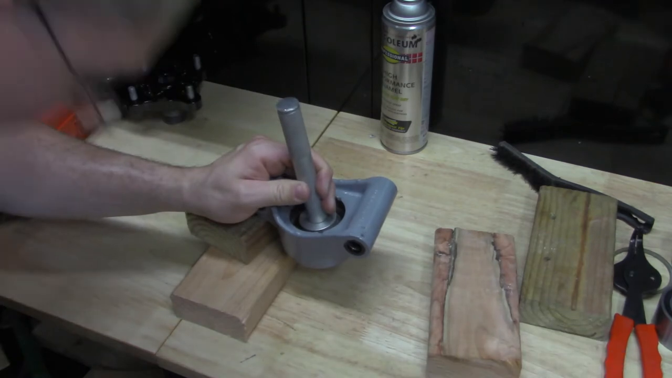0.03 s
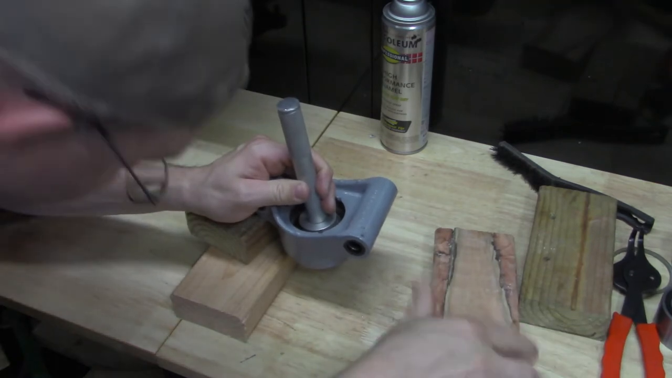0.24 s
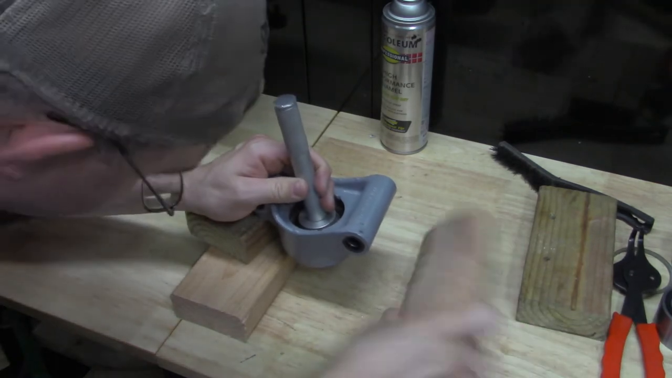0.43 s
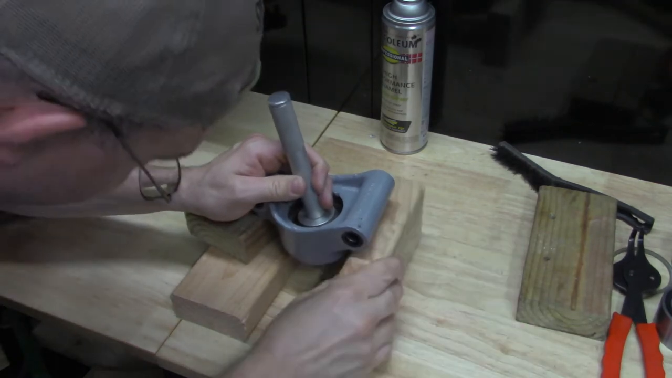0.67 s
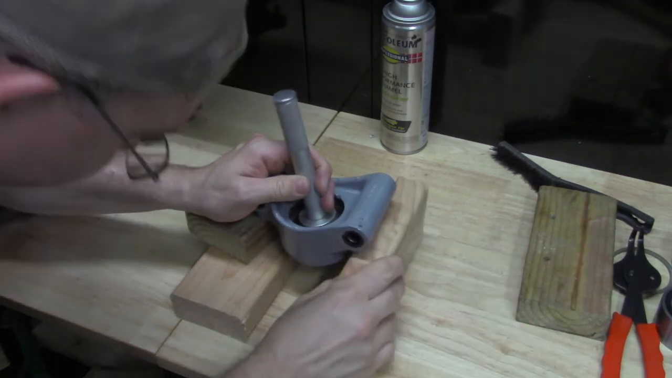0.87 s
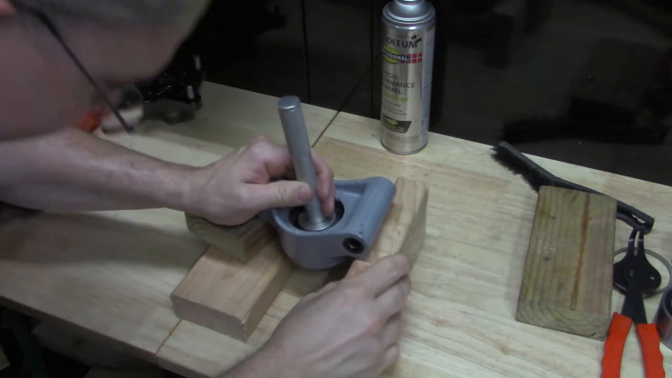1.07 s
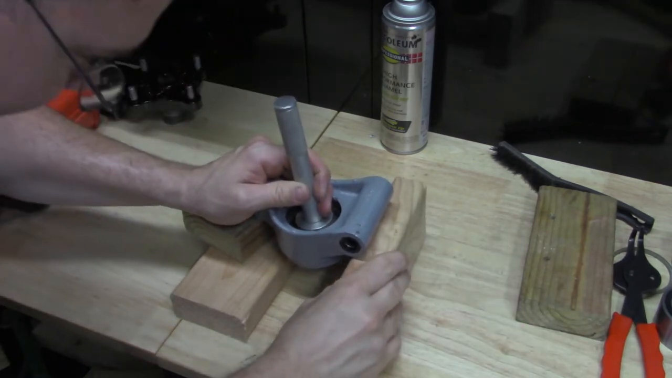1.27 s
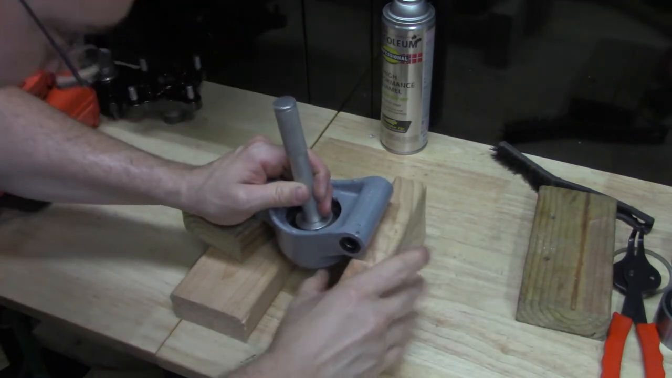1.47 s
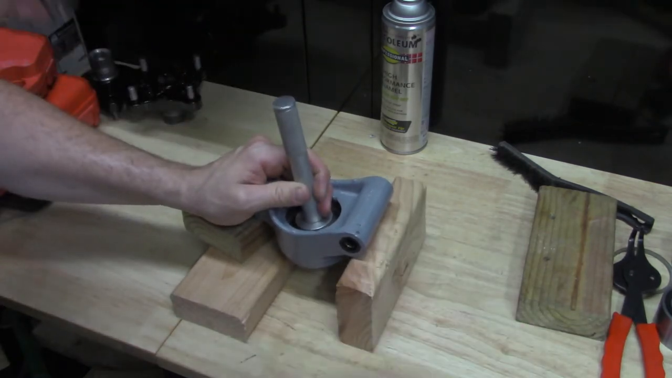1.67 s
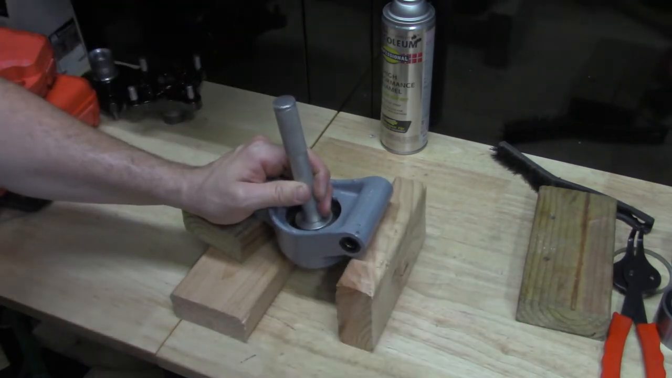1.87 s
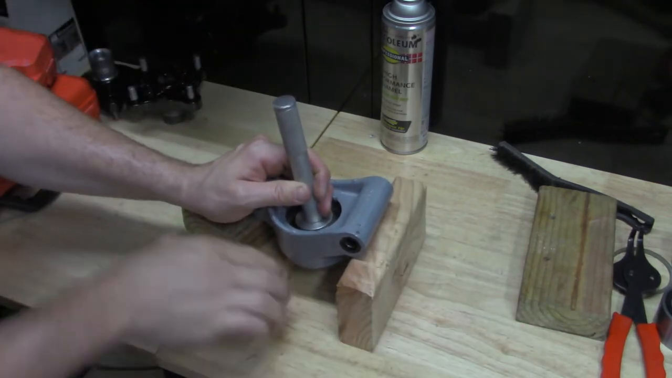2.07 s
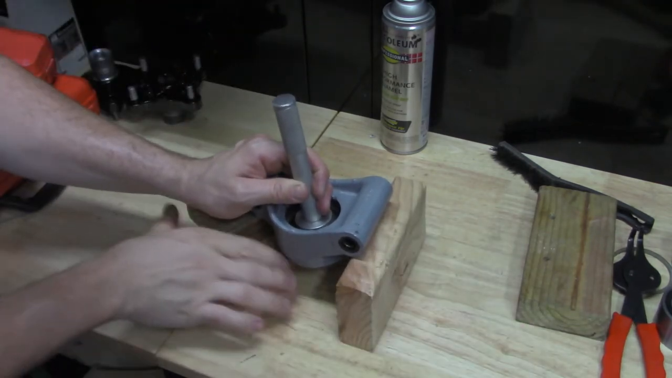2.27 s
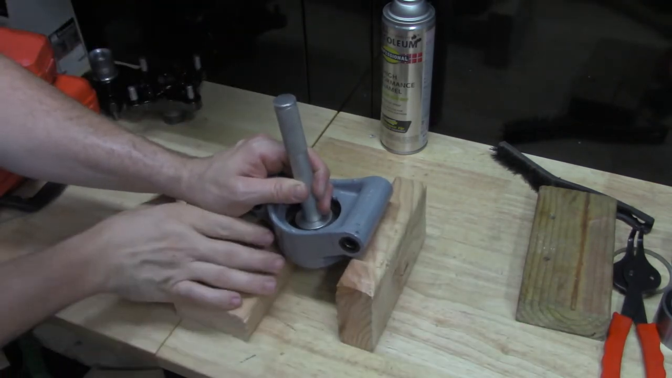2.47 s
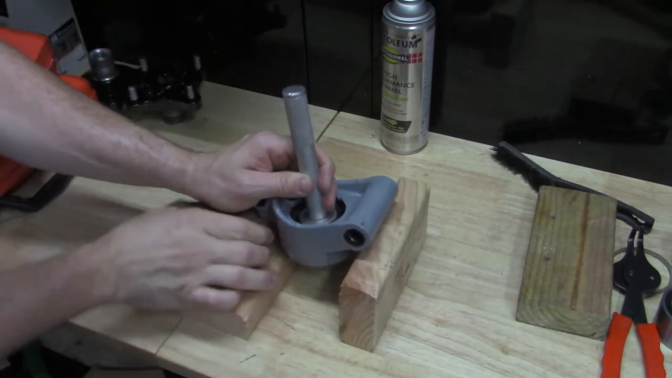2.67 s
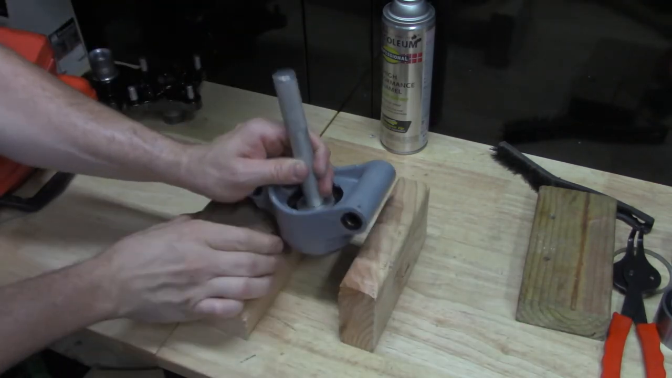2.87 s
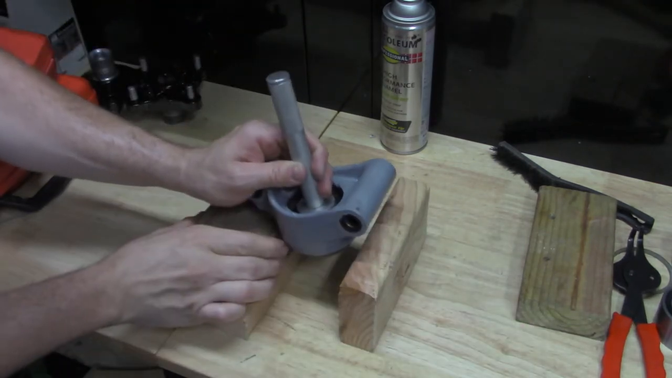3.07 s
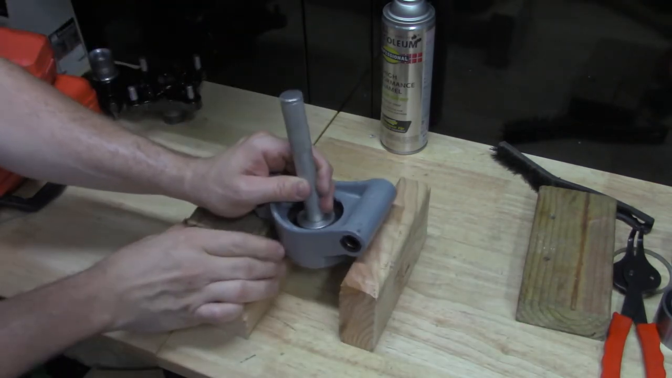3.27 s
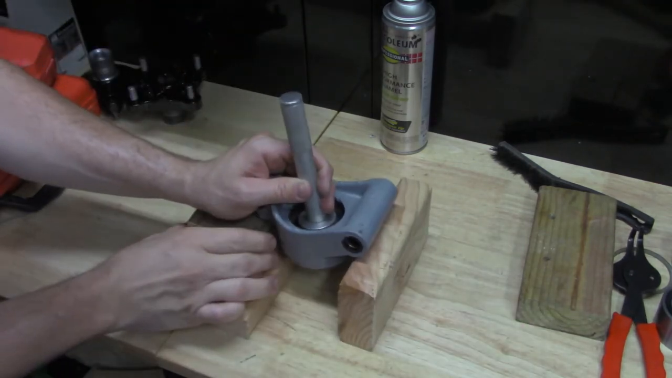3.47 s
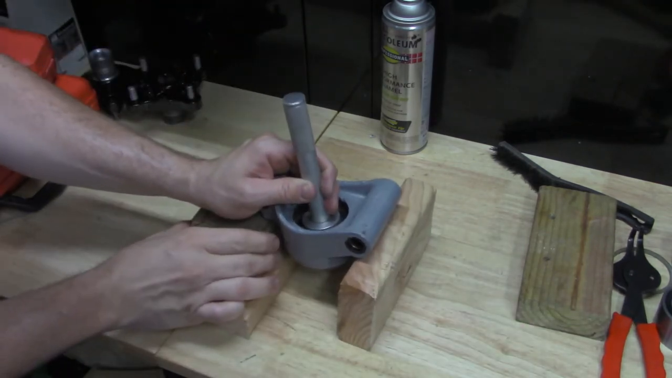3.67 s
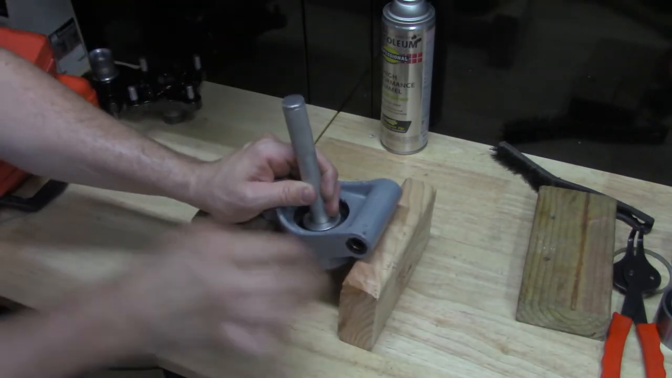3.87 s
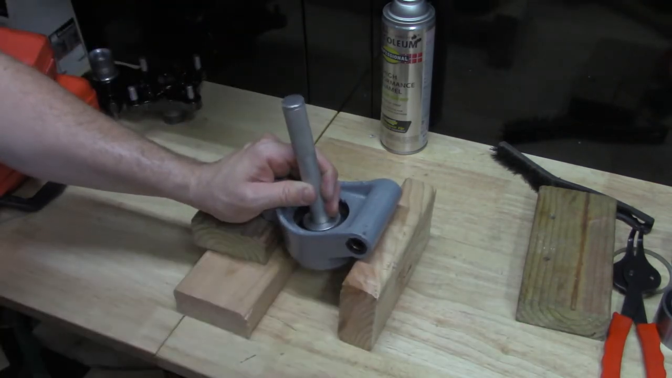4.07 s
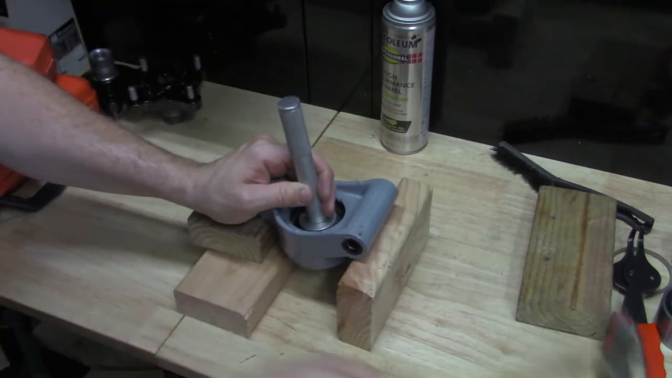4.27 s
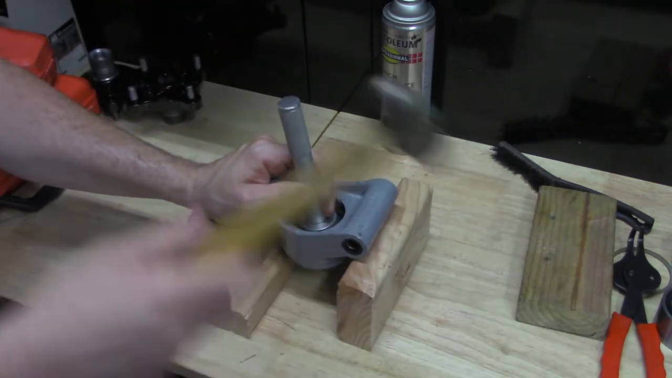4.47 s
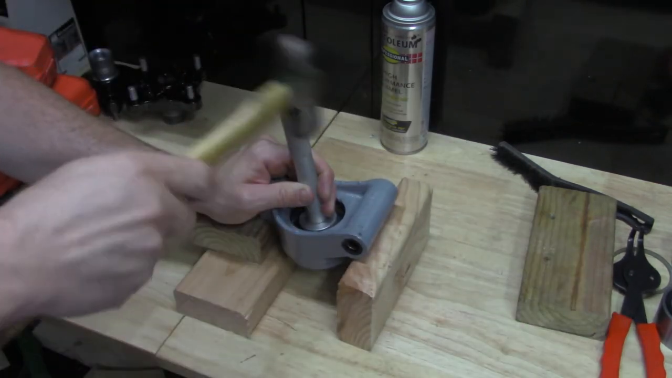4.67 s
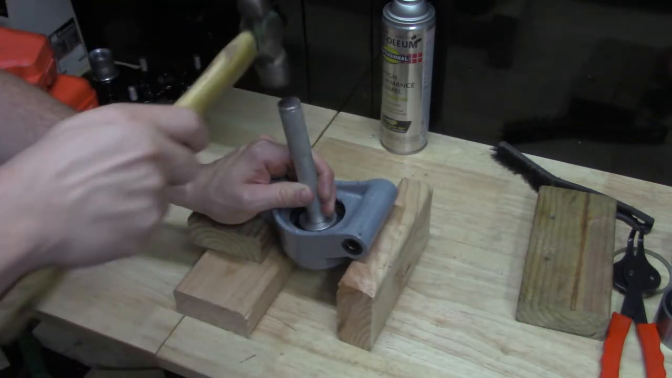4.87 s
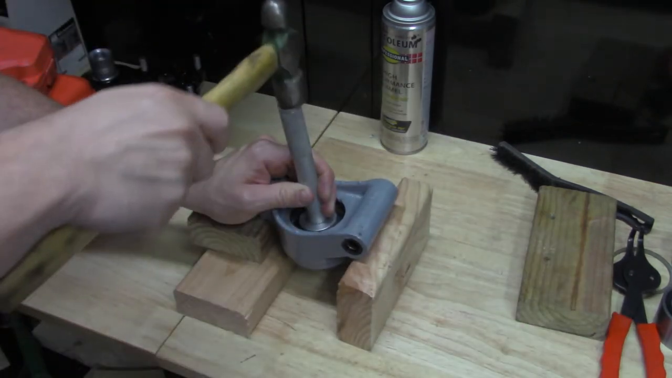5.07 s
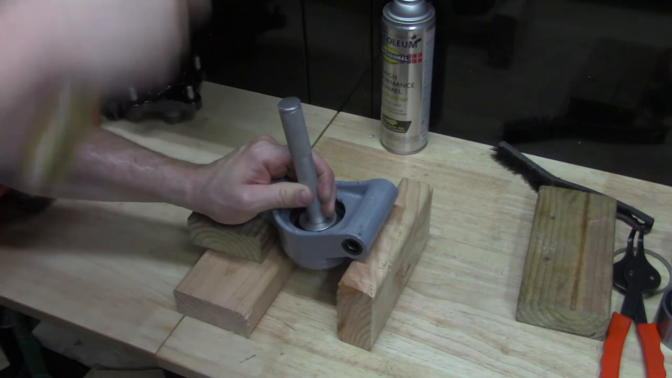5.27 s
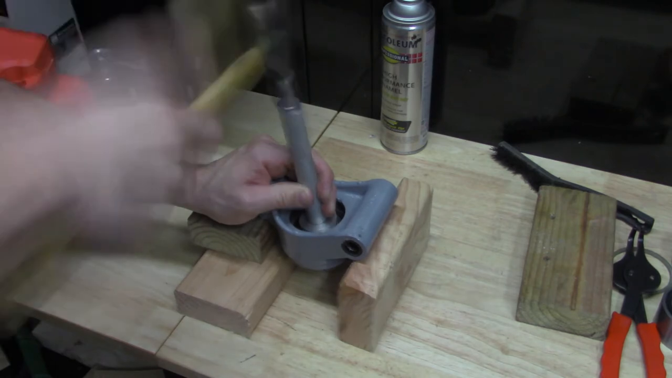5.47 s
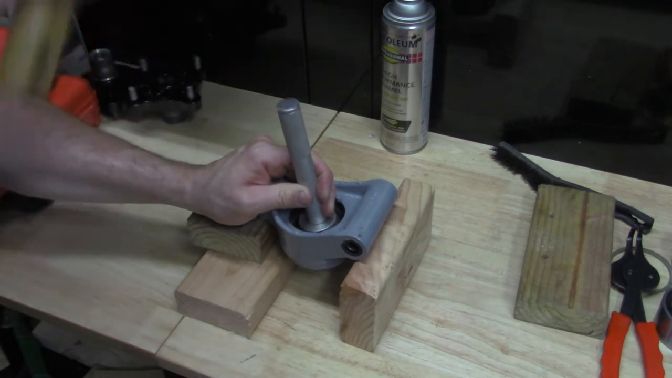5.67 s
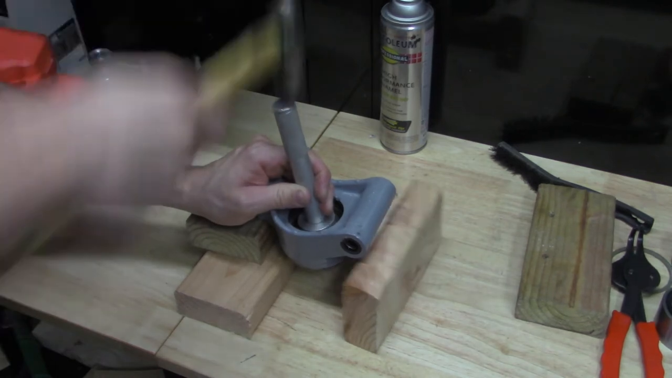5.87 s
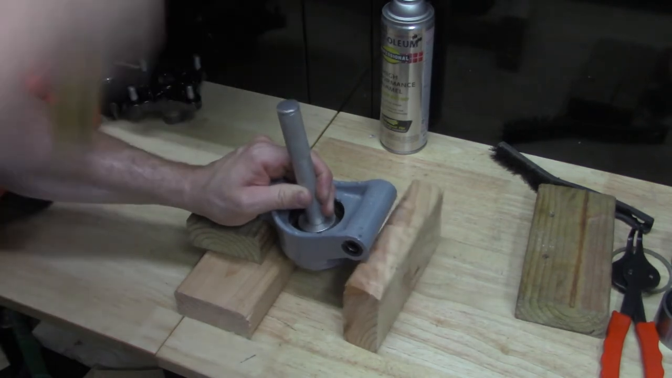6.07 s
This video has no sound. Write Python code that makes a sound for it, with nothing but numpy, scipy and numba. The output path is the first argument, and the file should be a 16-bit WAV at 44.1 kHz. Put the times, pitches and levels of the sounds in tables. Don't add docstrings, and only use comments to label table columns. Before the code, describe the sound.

A dropped wooden block clatters to rest on a bench, blocks scrape and knock, then three hard hammer blows strike a steel rod.

```python
import sys
import numpy as np
from scipy import signal
from scipy.fft import rfft, irfft, next_fast_len
from scipy.io import wavfile
from scipy.ndimage import uniform_filter1d, map_coordinates
from numba import njit

SR = 44100
rng = np.random.default_rng(int(sys.argv[2]) if len(sys.argv) > 2 else 0)


def pcm_store(signal):
    levels = np.round(np.clip(np.atleast_2d(signal), -1, 1) * 32767)
    wavfile.write(sys.argv[1], SR, levels.astype(np.int16).T)


def rack_gain(trim_db):
    fader = np.asarray(trim_db, float)
    return 10 ** (fader / 20)


N = 269892
LEAD = SR // 4

# (frequency [Hz], level [dB], t60 [s])
BENCH = [(79.6, -33, 0.2), (121.6, 1.5, 0.36), (183.4, 4, 0.082), (262.7, -11.5, 0.34), (400, -0.5, 0.16),
         (574, -5.5, 0.2), (740, -29, 0.093), (1100, -11, 0.54)]
# (frequency [Hz], correlation [0-1])
ALIKE = [(40, 0.86), (150, 0.65), (400, 0.55), (1500, 0.2), (5000, 0.69), (12000, 0.061)]


def along(points, hz):
    f, v = np.transpose(points)
    return np.interp(np.log(hz + 1), np.log(f + 1), v)


def unit(x):
    return x / np.sqrt(np.mean(x ** 2) + 1e-20)


def pair(size, shape_db):
    hz, s, z = signal.stft(rng.standard_normal((2, size)), SR, nperseg=512)
    angle = np.arccos(np.clip(along(ALIKE, hz), 0, 1))[:, None] / 2
    mid, side = z[0] * np.cos(angle), z[1] * np.sin(angle)
    shaped = np.array([mid + side, mid - side]) * rack_gain(shape_db(hz[:, None], s))
    return signal.istft(shaped, SR, nperseg=512)[1][:, :size]


def long_noise(spectrum):
    hz = np.fft.rfftfreq(N, 1 / SR)
    angle = np.arccos(np.clip(along(ALIKE, hz), 0, 1)) / 2
    noise = rfft(rng.standard_normal((2, N))) * rack_gain(along(spectrum, hz))
    mid, side = irfft(noise * [np.cos(angle), np.sin(angle)], N)
    return np.array([mid + side, mid - side])


def ring(modes, t, blur_hz):
    steps = rng.standard_normal((len(modes), len(t)))
    drift = np.sqrt(2 * np.pi * blur_hz / SR) * np.cumsum(steps, axis=1)
    drift = uniform_filter1d(drift, 90, axis=1) - drift[:, :1]
    out = np.zeros(len(t))
    for (hz, db, t60_s), phase in zip(modes, drift):
        strike_db = db + rng.normal(0, 1.3)
        out += rack_gain(strike_db - 60 * t / t60_s) * np.sin(2 * np.pi * hz * t + phase)
    return out


def dying_db(hz, s):
    # (frequency [Hz], t60 [s])
    room = [(60, 1), (130, 0.6), (260, 0.67), (700, 0.53), (1800, 0.34), (5000, 0.28), (12000, 0.24)]
    t60_s = along(room, hz)
    corner = rack_gain(-60 * s / (0.34 * t60_s))
    beyond = rack_gain(-8.0 - 60 * s / (1.118 * t60_s))
    return 20 * np.log10(corner + beyond)


def impact(colour, bright_db, echo_db, body, t, crack_s, touch_s):
    def tone_db(hz):
        return along(colour, hz) + bright_db * np.log2((hz + 50) / 1000)

    crack = unit(pair(len(t), lambda hz, s: tone_db(hz) + 0 * s)) * rack_gain(-60 * t / crack_s)
    tail = pair(len(t), lambda hz, s: tone_db(hz) + dying_db(hz, s))
    tail = tail / np.sqrt(np.mean(tail[:, :1500] ** 2))
    tail = tail * (1 - np.exp(-t / 0.016))
    walls = signal.fftconvolve(body[None], pair(len(t), dying_db), axes=1)[:, :len(t)]
    walls = walls / np.sqrt(np.mean(walls[:, :4000] ** 2))
    echo = rack_gain(echo_db) * (rack_gain(-2.5) * tail + rack_gain(-17.0) * walls)
    onset = np.sin(np.pi / 2 * np.clip(t / touch_s, 0, 1)) ** 2
    return onset * (crack + body + echo)


def add(track, s, sound):
    track[:, LEAD + round(s * SR):][:, :sound.shape[1]] += sound


def contacts():
    # (time [s], level [dB], edge note [Hz], brightness [dB/octave], echo [dB])
    tumble = [
        (-.09, 14.5, 2130, 4.5, -2),
        (.002, 6, 1814, 7, -3.5),
        (0.03, -1.5, 1700, 2.5, -3),
        (0.052, -6.5, 1454, 4, -5),
        (.078, 0.5, 1685, 7, -5),
        (.118, -5.5, 1620, 9.5, -10.5),
        (.125, -8, 1500, 7.5, 0.5),
        (.146, -18.5, 1360, -1.5, 6),
        (0.165, -19.5, 2343, 5, 5.5),
        (0.197, -24, 1500, 3, -12),
    ]
    # (time [s], level [dB], low note [Hz], high note [Hz], echo [dB])
    knocks = [(.505, -12.5, 241, 1030, -5), (.506, -18, 990, 1640, 2.5), (.531, -17.5, 683, 1320, -9),
              (.553, -23.5, 753, 1120, 0.5), (.58, -11.5, 924, 695, -10), (.581, -20, 2210, 2040, -3.5),
              (.663, -10, 574, 321, -10.5), (.925, -20.5, 294, 574, -11), (.932, -30.5, 256, 1080, 3),
              (.957, -23, 810, 482, -17.5), (3.19, -23.5, 705, 516, 2), (3.221, -4.5, 280, 518, -13),
              (3.228, -10, 906, 1330, -8), (3.249, -15.5, 726, 1140, 0), (4.174, -16, 543, 1220, -8),
              (4.178, -29.5, 1800, 1500, -2), (4.195, -27, 1240, 1584, -4), (4.213, -28.5, 1200, 1500, -10)]
    # (time [s], level [dB], note [Hz], brightness [dB/octave])
    nudges = [(.922, -24, 75, -7), (1.76, -40, 62, -8), (4.064, -34.5, 82, -8), (1.749, -43, 290, 0.5),
              (2.134, -45.5, 400, -2), (2.612, -35.5, 307, -5.5), (2.675, -30, 540, -6.5),
              (3.591, -34.5, 400, -4.5), (3.7, -43.5, 293, -6), (4.055, -49.5, 462, 5.5),
              (4.101, -37.5, 283, -5.5), (4.13, -38.5, 850, 4), (5.395, -48, 122, -9)]
    # (time [s], level [dB], low note [Hz], high note [Hz], brightness [dB/octave])
    rebounds = [
        (4.975, -20, 250, 2500, 2.5),
        (5.07, -25.5, 122, 90, -10.5),
        (5.562, -3.5, 400, 1180, 6.5),
        (5.621, -9, 115, 386, -8),
        (5.94, -6.5, 111, 500, 2),
        (5.985, -9, 106.5, 214, -12),
    ]
    rows = []
    faces = 1 + 0.12 * rng.standard_normal(len(tumble))
    for (s, db, edge_hz, bright_db, echo_db), face in zip(tumble, faces):
        rows.append((s, db, 1045 * face, edge_hz, bright_db, echo_db))
    for s, db, low_hz, high_hz, echo_db in knocks:
        bright_db = 3 + 2 * np.log2(high_hz / 1000)
        rows.append((s, db, low_hz, high_hz, bright_db, echo_db))
    for s, db, note_hz, bright_db in nudges:
        rows.append((s, db, note_hz, 260, bright_db, 0.5))
    for s, db, low_hz, high_hz, bright_db in rebounds:
        rows.append((s, db, low_hz, high_hz, bright_db, 0))
    return rows


def blocks():
    # (frequency [Hz], density [dB/Hz])
    wood = [(24, -63), (40, 0.5), (284, 0.5), (728, -2.5), (824, -5), (1030, -7.5), (1290, -11),
            (6780, -46.5), (13900, -83), (15000, -103)]
    track, t = np.zeros((2, N + 2 * SR)), np.arange(int(.7 * SR)) / SR
    for s, db, low_hz, high_hz, bright_db, echo_db in contacts():
        notes = [(low_hz, 2.5, 0.038 + 9 / low_hz), (high_hz, -2.5, 0.017 + high_hz / 33000)]
        body = ring(notes, t, blur_hz=60.3)
        body = body + rack_gain(-22) * ring(BENCH, t, blur_hz=5.7)
        touch_s = 0.0008 * rack_gain(-2.5 * bright_db)
        add(track, s, rack_gain(db) * impact(wood, bright_db, echo_db, body, t, crack_s=0.038, touch_s=touch_s))
    return track[:, LEAD:LEAD + N]


def hammer():
    # (time [s], level [dB], bench thud [dB], hammer head ring [dB], echo [dB])
    blows = [
        (4.936, -8, -7.5, -13, -0.5),
        (5.47, 11.5, -2, -43, 4.5),
        (5.813, 21.5, -12, -46, -5.5),
    ]
    # (frequency [Hz], level [dB], t60 [s])
    steel = [(1500, 4.5, 0.03), (2310, 3.5, 0.015), (2466, -2, 0.051), (3080, 4, 0.032),
             (4100, 12.5, 0.0038), (5790, 2.5, 0.013), (7220, 1.5, 0.013), (8900, -5, 0.031),
             (9970, -10, 0.004)]
    # (frequency [Hz], level [dB], t60 [s])
    head = [(4330, -3, .22), (4420, 0, .26), (4520, 0, .26), (4640, -4, .21)]
    # (frequency [Hz], density [dB/Hz])
    clang = [(24, -12), (40, -12), (1270, -3.5), (1410, -5), (1550, -6), (1950, -3.5), (2380, -11.5),
             (2630, -7.5), (3380, -10.5), (8340, -18.5), (16000, -41)]
    track, t = np.zeros((2, N + 2 * SR)), np.arange(int(.9 * SR)) / SR
    for s, db, thud_db, head_db, echo_db in blows:
        body = rack_gain(-3.5) * ring(steel, t, blur_hz=40)
        body = body + rack_gain(head_db + 3) * ring(head, t, blur_hz=130)
        thud = ring(BENCH, t, blur_hz=12.7) * (1 - np.exp(-t / 0.0024))
        body = body + rack_gain(thud_db - 5) * thud
        add(track, s, rack_gain(db) * impact(clang, 3, echo_db, body, t, crack_s=0.022, touch_s=0.0009))
    return track[:, LEAD:LEAD + N]


def sliding():
    # (start [s], length [s], scuff level
    # [dB], dry whisper above scuff [dB])
    slides = [(0.21, 0.32, -55, -10), (0.423, 0.093, -49.5, 0), (0.625, 0.091, -45, -7),
              (1.13, 0.21, -61, -25), (1.654, 0.64, -57.5, -30), (2.136, 0.012, -50, -5),
              (2.141, 0.097, -59.5, 2.5), (2.225, .06, -58, 2), (2.384, .014, -53, -1),
              (2.395, 0.2, -60, -8), (0.918, 0.078, -51, -7), (3.193, 0.15, -45.5, -3.5),
              (2.526, 0.64, -55, -5), (2.884, 0.21, -66, -12), (3.753, .1, -67, -14),
              (3.983, 0.41, -57.5, -9), (4.397, 0.28, -61, -18)]
    # (frequency [Hz], density [dB/Hz])
    scuff_colour = [(300, -20), (1000, 11.5), (2500, 5), (4000, 6.5), (4450, 7), (4900, 2), (6500, 0.5),
                    (9000, -49)]
    # (frequency [Hz], density [dB/Hz])
    whisper_colour = [(5000, 0), (7000, 6), (8500, 3), (11000, -4), (15500, -17)]
    grip, let_go = 0.091, 0.53
    catch_db, catches_per_s = 1.5, 12
    t, scuff, whisper = np.arange(N) / SR, np.zeros(N), np.zeros(N)
    catches = rack_gain(catch_db * map_coordinates(rng.standard_normal(400), [t * catches_per_s]))
    for s, length_s, db, whisper_db in slides:
        ramps = np.minimum((t - s) / grip, (s + length_s - t) / let_go)
        stroke = catches * np.clip(ramps / length_s, 0, 1)
        scuff += rack_gain(db) * stroke
        whisper += rack_gain(db + whisper_db) * stroke
    patches = rng.standard_normal((257, N // 256 + 3))
    patches = uniform_filter1d(uniform_filter1d(patches, 5, 0), 12, 1)
    patches_db = 2 * unit(patches)

    def hiss(colour):
        return unit(pair(N, lambda hz, s: along(colour, hz) + patches_db[:, :len(s)]))

    rub = uniform_filter1d(scuff, 300) * rack_gain(2.5) * hiss(scuff_colour)
    return rub + uniform_filter1d(whisper, 300) * hiss(whisper_colour)


def room_tone():
    # (frequency [Hz], density [dB/Hz])
    air = [(12, -15), (20, 0), (91, -5.5), (127, -0.5), (177, -23.5), (255, -7.5), (285, -12.5), (422, -20),
           (459, -20), (759, -18), (849, -19.5), (923, -19), (2080, -21.5), (16000, -48.5)]
    hum = pair(N, lambda hz, s: -30 * np.log10(1 + ((hz - 122) / 90) ** 2) + 0 * s)
    hum = signal.sosfilt(signal.butter(2, [105, 140], "bandpass", fs=SR, output="sos"), hum)
    return rack_gain(-45) * (unit(long_noise(air)) + rack_gain(-2.0) * unit(hum))


def scene():
    return blocks() + hammer() + sliding() + room_tone()


@njit
def follow(size, attack, release):
    out, level = np.empty_like(size), size[:400].mean()
    for i in range(len(size)):
        level += (size[i] - level) * (attack if size[i] > level else release)
        out[i] = level
    return out


def highpass(x, hz):
    return signal.sosfilt(signal.butter(1, hz, "highpass", fs=SR, output="sos"), x)


def band_limit(x):
    return signal.sosfilt(signal.butter(12, 16340, fs=SR, output="sos"), x)


def record(dry):
    # (frequency [Hz], left minus right [dB])
    tilt = [(25, 5), (60, 5.5), (110, 3), (200, 8), (380, 10.5), (700, 11), (1290, 10), (2380, 10.5),
            (4400, 7), (8120, 1), (15000, 2)]
    # (frequency [Hz], left lead [rad])
    lag = [(3000, 0.5), (6900, 0.33), (9800, -3), (15000, -4.5)]
    squashed = -rack_gain(8.0) * np.log1p(-np.minimum(dry, 0) / rack_gain(7.5))
    x = highpass(np.where(dry < 0, squashed, dry), 25)
    side = highpass((x[0] - x[1]) / 2, 90)
    x = x.mean(axis=0) + np.array([side, -side])

    heard = np.abs(highpass(x, 600)).max(axis=0)
    level = follow(heard, 1 / (0.0067 * SR), 1 / (0.018 * SR))
    x = x * (1 + (level / rack_gain(-14)) ** 4) ** (-.97 / 4)

    m = next_fast_len(N + 4096)
    hz = np.fft.rfftfreq(m, 1 / SR)
    left = rack_gain(along(tilt, hz) / 2) * np.exp(.5j * along(lag, hz))
    x = irfft(rfft(x, m) * [left, 1 / left], m)[:, :N]
    x = x / (1 + np.abs(x) ** 6) ** (1 / 6)
    return band_limit(x)


dry = scene()
out = record(dry)
pcm_store(out)
```